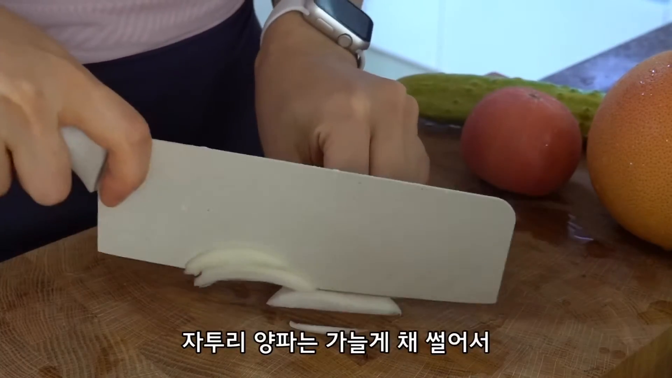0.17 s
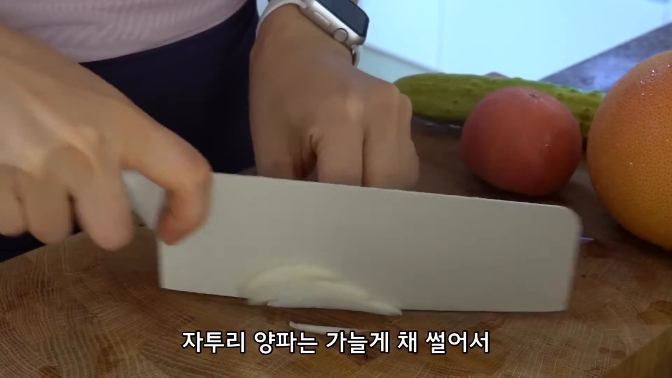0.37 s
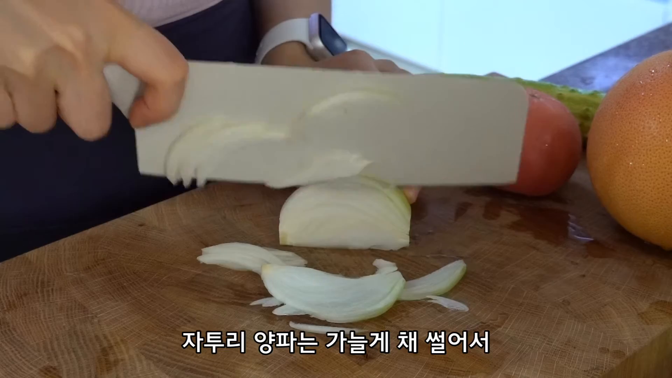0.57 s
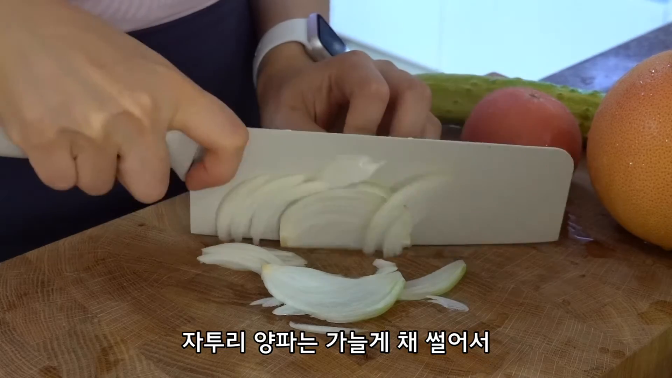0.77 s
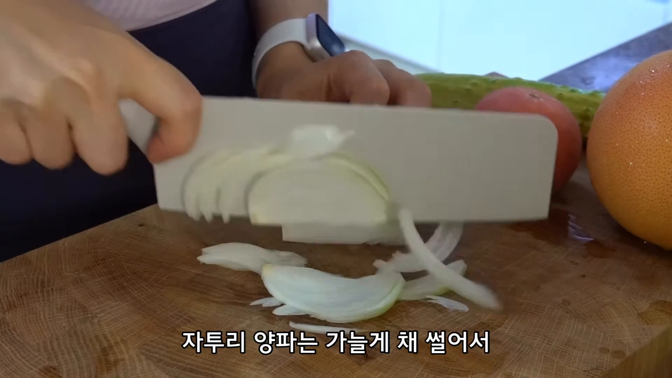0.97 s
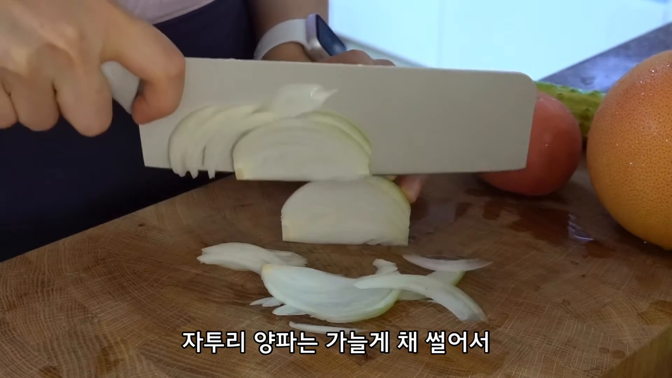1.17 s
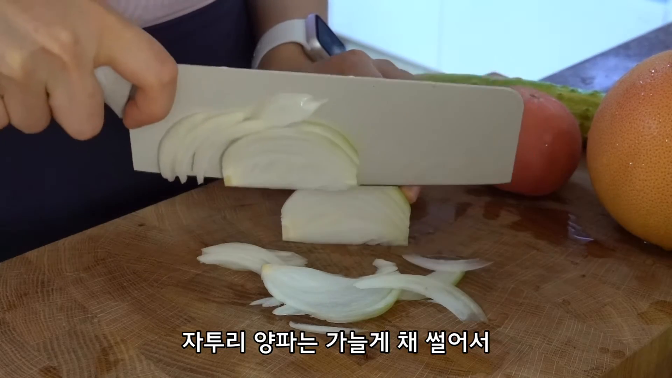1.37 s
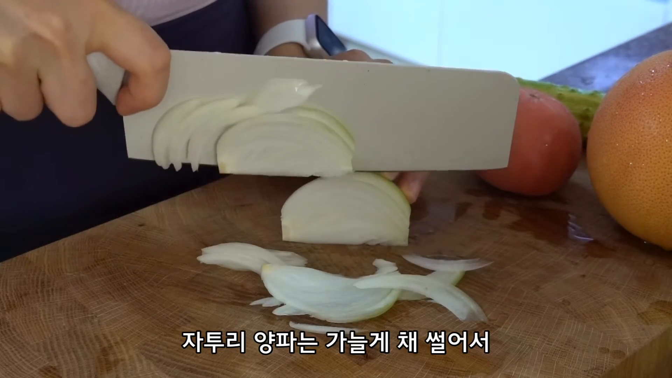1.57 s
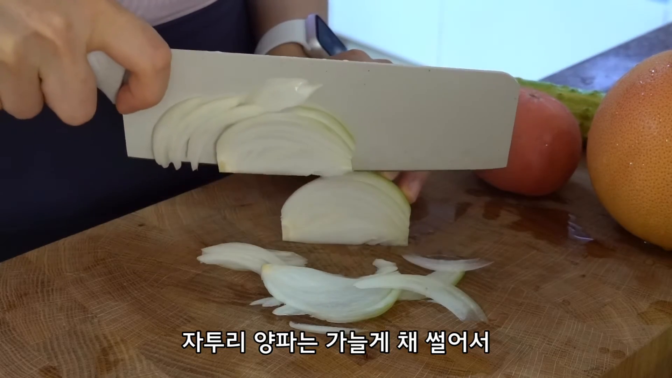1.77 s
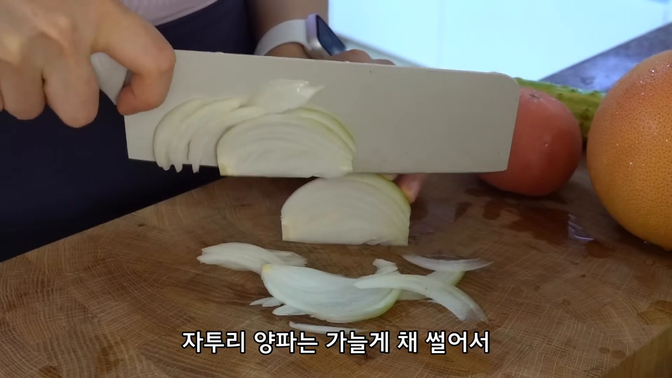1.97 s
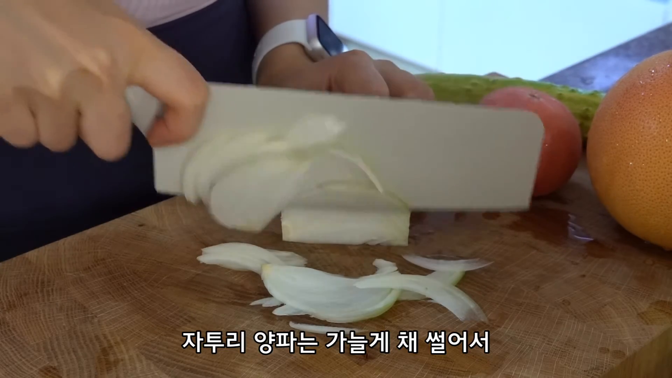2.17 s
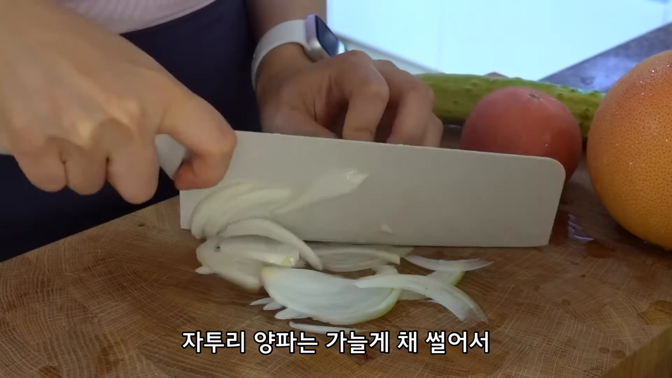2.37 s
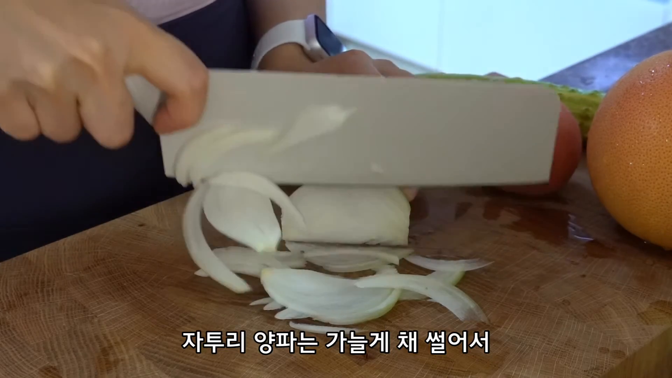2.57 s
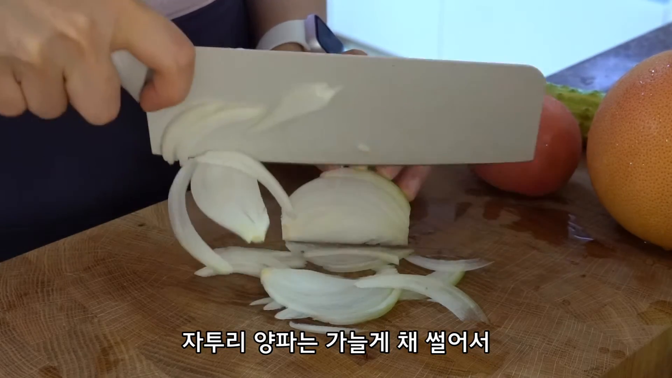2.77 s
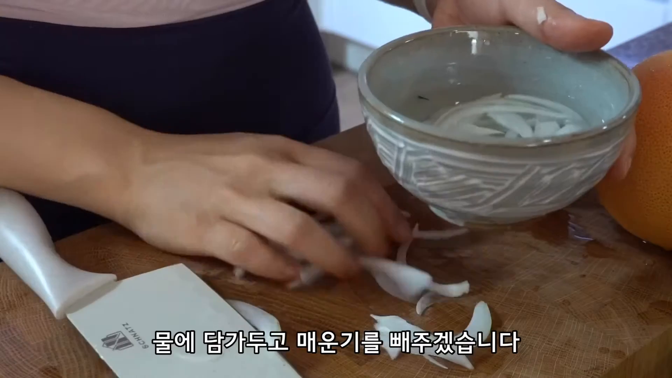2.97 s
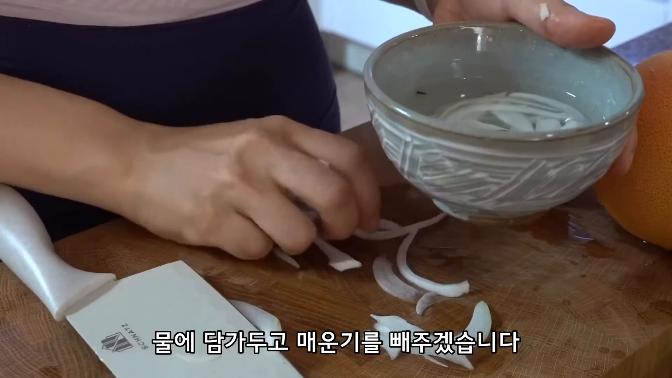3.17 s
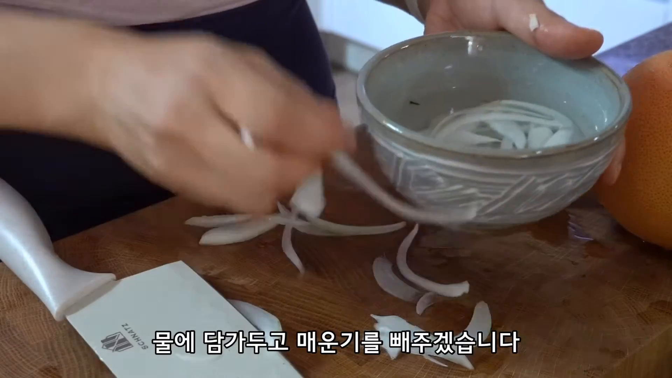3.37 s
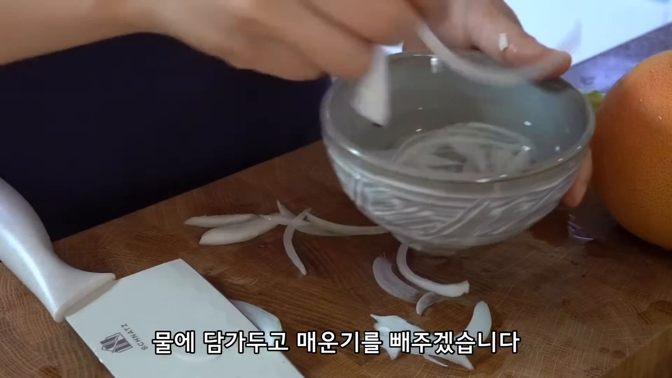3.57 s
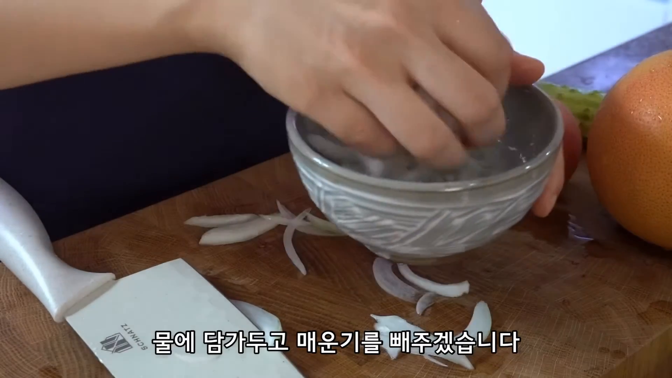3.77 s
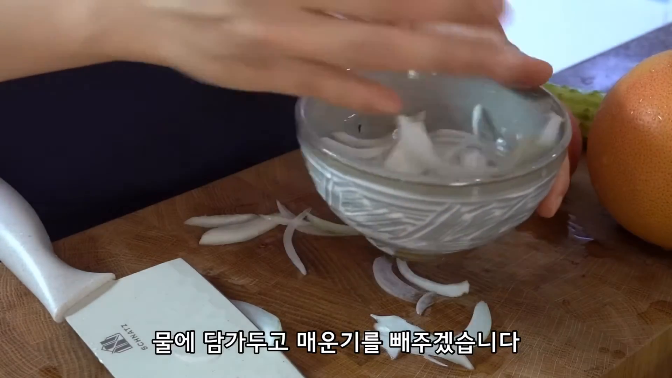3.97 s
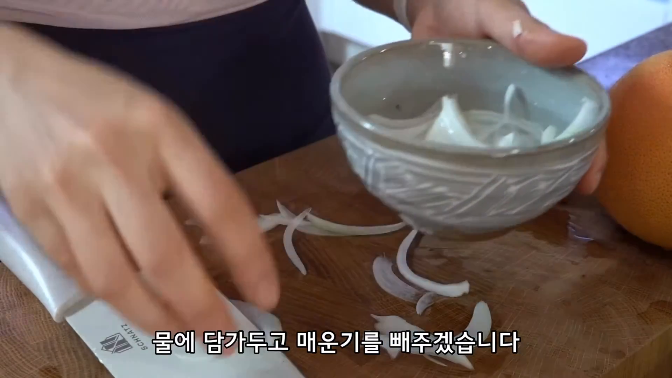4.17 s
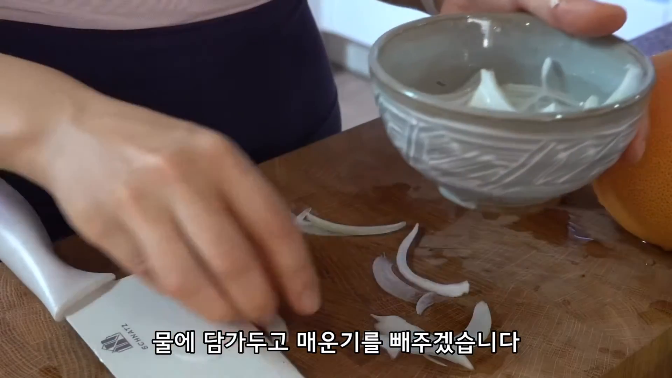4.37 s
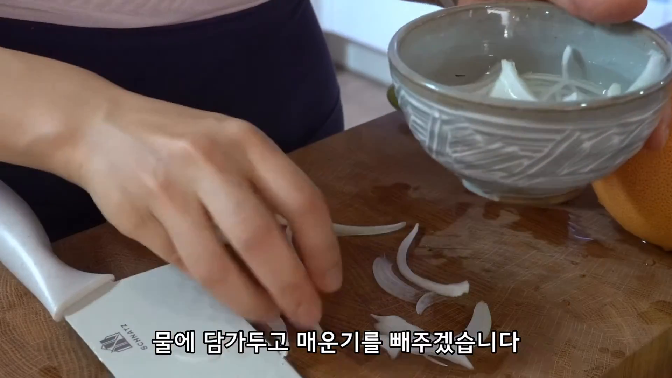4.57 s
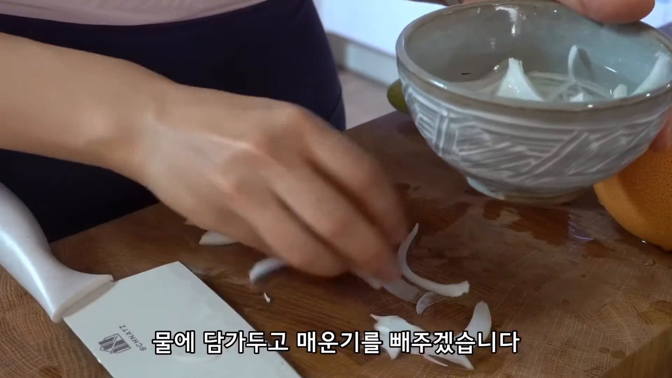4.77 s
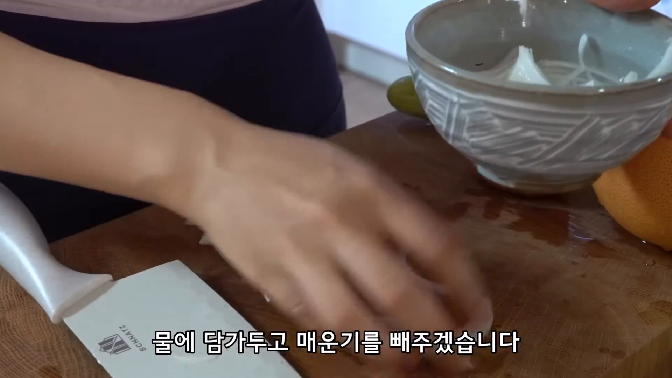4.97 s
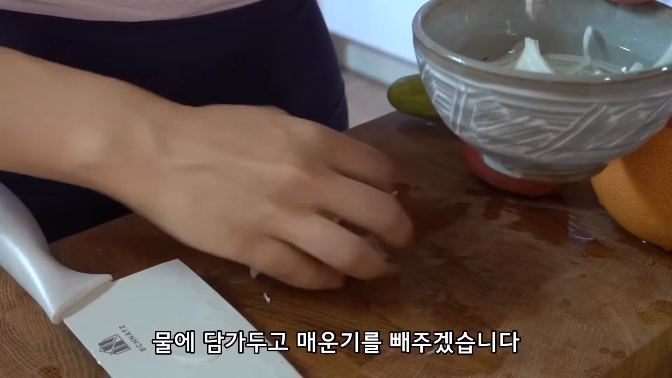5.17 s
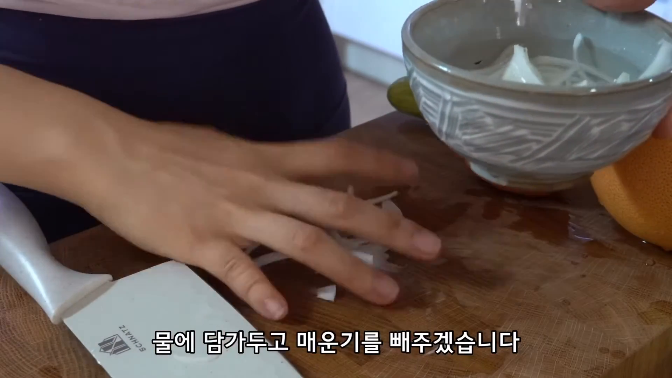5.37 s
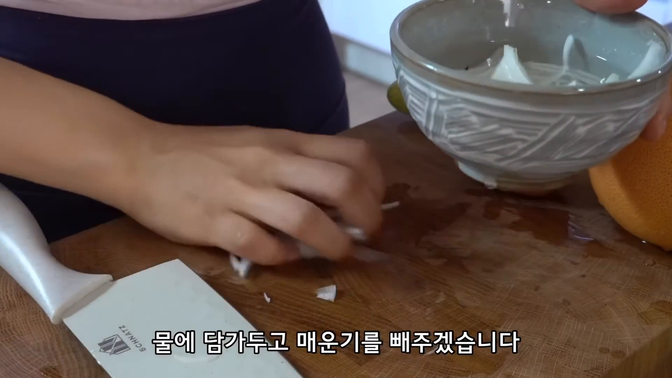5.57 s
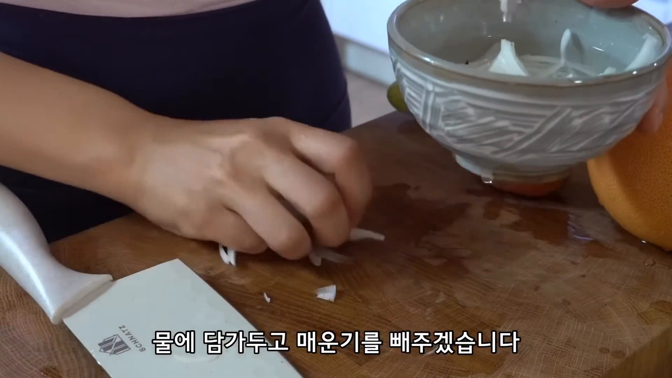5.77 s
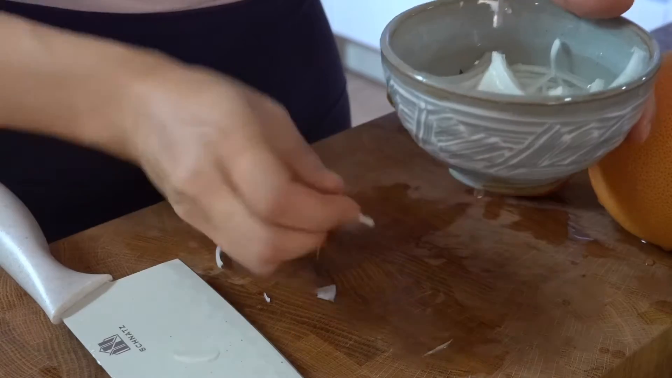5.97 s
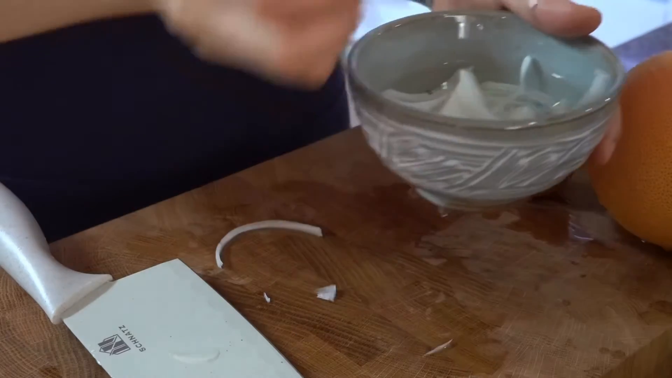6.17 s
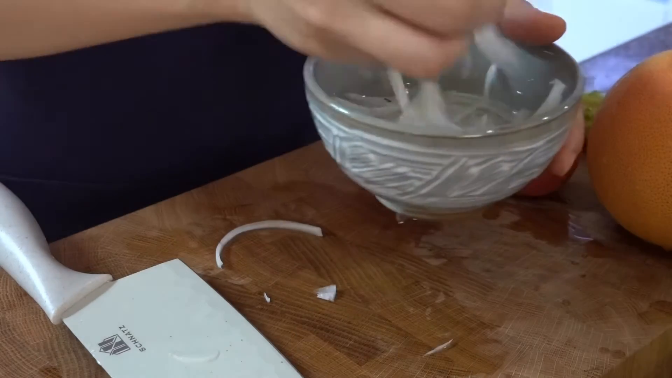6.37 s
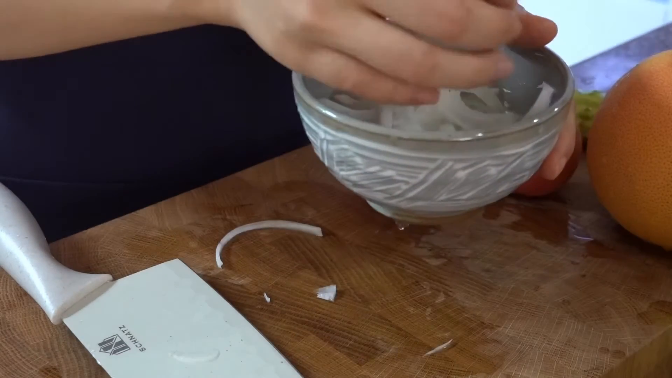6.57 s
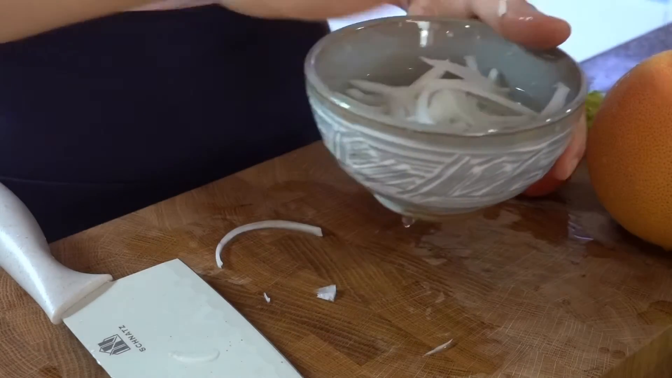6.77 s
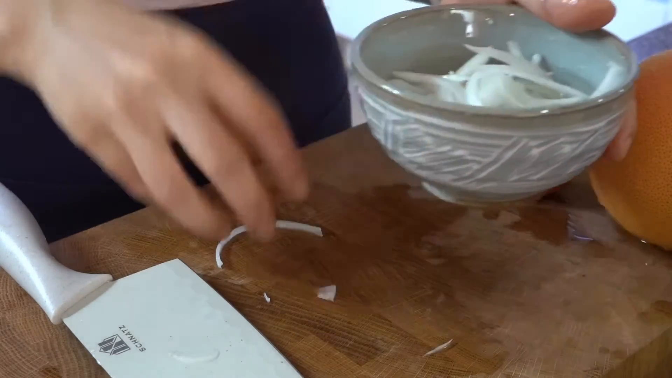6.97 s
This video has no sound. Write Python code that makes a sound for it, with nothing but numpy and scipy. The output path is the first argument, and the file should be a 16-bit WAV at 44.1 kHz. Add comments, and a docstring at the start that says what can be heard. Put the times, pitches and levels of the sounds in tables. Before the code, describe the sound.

A broad kitchen knife slices an onion three times, each crisp crunch ending in a ringing knock on a thick wooden board. Two cuts come close together, and the loudest follows a pause. A hand then softly sweeps up wet slices, nudges the resting knife into a short double rattle, and makes a few small wet smacks. Everything is close, in a hard-walled kitchen with a faint airy hum.

```python
"""Three crunching slices through an onion, each ending in a ringing knock, close up in a hard-walled kitchen.
Bursting cells spit and shake the broad knife until its edge lands and rings blade and thick wooden board.
A hand then sweeps up the wet slices, which stick and slip on the wood, nudges the resting knife into
a rattle, and drops the slices in a bowl with a few wet smacks. A faint airy hum lies underneath,
and a limiter holds the knocks down."""
import sys
import numpy as np
from scipy import signal
from scipy.fft import rfft, irfft, next_fast_len
from scipy.io import wavfile
from scipy.ndimage import uniform_filter1d, minimum_filter1d

SR = 44100
rng = np.random.default_rng(int(sys.argv[2]) if len(sys.argv) > 2 else 0)


def inscribe(sig):
    """Save sig as 16-bit PCM at rate SR to the path in sys.argv[1].

    A 1-D sig is mono; a 2-D sig holds one channel per row.
    Samples are clipped to [-1, 1] before scaling.
    """
    pcm = np.round(np.clip(np.atleast_2d(sig).T, -1, 1) * 32767)
    wavfile.write(sys.argv[1], SR, pcm.astype(np.int16))


N = 309141
TIME = np.arange(N) / SR

# The edge meets the board. Each row: time in seconds, blow in dB, highest pitch the contact drives in Hz,
# pitch favoured by that spot in Hz, its lift in dB, board thud in dB.
CHOPS = [(0.2690, -2, 2280, 1330, 6, -21), (0.6978, 0, 1940, 1840, 6.5, -20),
         (2.2131, 7.5, 3000, 1810, 11, -17.5)]
# The ring of the blade pressed on the board. Each row: pitch in Hz, level in dB, t60 in seconds.
BLADE = [(948.4, 1.5, 0.037), (1038, 1.5, 0.049), (1107, -1, 0.021), (1551, -2.5, 0.015),
         (1578, -7.5, 0.042), (1820, -11.5, 0.012), (1955, -2.5, 0.023), (2144, -7, 0.013),
         (2390, -11.5, 0.041), (2400, -6, 0.041), (2864, -0.5, 0.02), (3190, -7.5, 0.018),
         (4060, -5, 0.0041)]
# The dull body of the board. Each row: pitch in Hz, level in dB, t60 in seconds.
BOARD = [(147, -13, 0.065), (214, -10, 0.024), (308, -4, 0.044), (375.5, -0.5, 0.03), (420, -1, 0.029),
         (505, 3.5, 0.025), (565, 3.5, 0.0093), (818, 3.5, 0.013)]


def undb(db):
    """Decibels to gain."""
    return 10 ** (np.asarray(db) / 20)


def unit(x):
    """Scale to rms 1."""
    return x / np.sqrt(np.mean(x ** 2))


def decay(t, t60):
    """Envelope that falls by 60 dB in t60 seconds."""
    return np.exp(-np.log(1000) * t / t60)


def across(points, size):
    """A (Hz, value) table read at the bins of a spectrum of `size` samples."""
    hz, value = np.transpose(points)
    return np.interp(np.log(np.arange(size // 2 + 1) * SR / size + 1), np.log(hz), value)


def colour(x, points):
    """Filter by a (Hz, dB) table."""
    size = next_fast_len(len(x))
    return irfft(rfft(x, size) * undb(across(points, size)), size)[:len(x)]


def cut(x, hz, kind, order):
    """Causal low-pass or high-pass."""
    return signal.sosfilt(signal.butter(order, min(hz, SR / 2 - 100), kind, fs=SR, output="sos"), x)


def resonate(x, hz, q):
    """The band that one resonance picks out of a sound."""
    return signal.lfilter(*signal.iirpeak(hz, q, fs=SR), x)


def add(track, s, sound, db):
    """Mix a sound into a track at time s, with its peak at db."""
    start = int(s * SR)
    track[start:start + len(sound)] += (undb(db) * sound / np.abs(sound).max())[:len(track) - start]


def ring(modes, contact_s=.0001):
    """Struck modes, their dB setting energy; neighbours swing opposite ways, soft contact dulls the hit."""
    t = TIME[:int(max(row[2] for row in modes) * SR * 2)]
    tones = sum((-1) ** k * undb(db) / np.sqrt(t60) * np.sin(2 * np.pi * hz * t) * decay(t, t60)
                for k, (hz, db, t60) in enumerate(modes))
    return tones * (1 - np.exp(-t / contact_s))


def burst(t60, highpass_hz, lowpass_hz, orders=(2, 3)):
    """A short band of tearing noise that dies away."""
    t = TIME[:SR // 20]
    noise = rng.standard_normal(len(t)) * decay(t, t60)
    return cut(cut(noise, highpass_hz, "high", orders[0]), lowpass_hz, "low", orders[1])


def grains(per_s, spread_db):
    """Tiny clicks at random moments, a few much larger than the rest."""
    size = undb(spread_db * np.minimum(rng.exponential(size=N), 4))
    return (rng.random(N) < per_s / SR) * rng.choice([-1, 1], N) * size


def spurts(per_s, spread_db):
    """Gain of onion that yields unevenly, in small spurts."""
    return undb(spread_db * np.interp(TIME * per_s, np.arange(N), rng.standard_normal(N)))


def move(s, swell_s, hold_s, db, fade_db_per_s, swell_db=27):
    """Gain of one rubbing move: it swells up to time s, holds and fades."""
    before, after = np.maximum(s - TIME, 0), np.maximum(TIME - s - hold_s, 0)
    return undb(db - swell_db * before / swell_s - fade_db_per_s * after)


def diffuse(size):
    """Noise that arrives from all sides: alike left and right in the bass, unrelated in the treble."""
    # Stereo width. Each row: frequency in Hz, side minus mid in dB.
    width = [(40, -7.5), (140, -40), (350, -17.5), (700, -8), (1000, -8), (2200, -7.5), (3500, -1),
             (5500, 0.5), (8000, 2), (12000, -2.5)]
    side_gain = undb(across(width, size))
    mid, side = rfft(rng.standard_normal((2, size)))
    left_right = mid + np.array([[1], [-1]]) * side_gain * side
    return irfft(left_right / np.sqrt(1 + side_gain ** 2), size)


def background(level_db=-54, waver_db=1.26):
    """Steady airy hum of the kitchen with two faint resonances, wavering a little."""
    # The colour of the hum. Each row: frequency in Hz, relative level in dB.
    hum = [(25, -49), (60, -35), (110, -17), (180, -15.5), (330, -3.5), (550, -2), (830, -5), (1040, -3),
           (1400, -4.5), (2050, -1), (2900, -10), (4500, -13), (9000, -19), (16000, -20)]
    # Its narrow resonances. Each row: pitch in Hz, width in Hz, lift in dB.
    hum_peaks = [(1060, 55, 6.5), (1984, 90, 3.5)]
    waver = np.interp(TIME, np.linspace(0, TIME[-1], 40), rng.standard_normal(40))
    air = np.array([colour(channel, hum) for channel in diffuse(N)])
    for hz, width_hz, lift_db in hum_peaks:
        air = air + (undb(lift_db) - 1) * resonate(air, hz, q=hz / width_hz)
    return unit(air) * undb(level_db + waver_db * waver)


def kitchen(build_s=0.0049, smooth_bins=24):
    """Response of the hard-walled room: a few clear reflections and a dense, even tail."""
    # The reverberation. Each row: frequency in Hz, t60 in seconds.
    reverb_times = [(100, 0.51), (400, 0.46), (1000, 0.63), (2000, 0.58), (3000, 0.58), (5000, 0.65),
                    (10000, 0.63), (16000, 0.67)]
    # First reflections from counter, wall and ceiling. Each row: delay in seconds, level in dB.
    echoes = [(.0082, -10), (.0150, -23), (.0225, -11.5), (.0312, -30), (.0440, -9)]
    t = TIME[:SR]
    noise, tail = rfft(diffuse(SR)), 0
    for hz, t60 in reverb_times:
        share = across([(f, float(f == hz)) for f, _ in reverb_times], SR)
        tail = tail + irfft(noise * share, SR) * decay(t, t60)
    # even out the tail's peaks and dips, so the room rings smoothly with no stray pitches
    spectrum = rfft(tail)
    power = uniform_filter1d(np.mean(np.abs(spectrum) ** 2, axis=0), smooth_bins)
    tail = irfft(spectrum / np.sqrt(power), SR)
    build_up = 1 - np.exp(-(t / build_s) ** 2)
    fade_out = np.clip((.7 - t) * 10, 0, 1)
    tail = unit(tail * build_up * fade_out) / np.sqrt(SR)
    for delay_s, db in echoes:
        tail[:, int(delay_s * SR)] += undb(db)
    return tail


def nearby(x, scatter_db=-4, scatter_t60=0.028):
    """Board, hands and bowl scatter the treble within milliseconds, differently to left and right."""
    t = TIME[:SR // 20]
    response = unit(diffuse(len(t)) * decay(t, scatter_t60)) / np.sqrt(len(t))
    treble = cut(response, 4700, "high", order=3)
    return x + undb(scatter_db) * signal.fftconvolve(x[None], treble, axes=1)[:, :N]


def gathering(rub_db=-2, crackle_db=-3, push_db=-5):
    """Wet slices stick and slip on the wood while films of juice break."""
    # Fingers sweep, lift or drop slices. Each row: time of full contact, swell and hold in seconds,
    # then rubbing and wet crackle in relative dB.
    sweeps = [(0.01, .01, 0.091, -55.5, -69), (1.36, 0.45, 0.17, -59.5, -75),
              (2.848, 0.0075, .23, -48, -50), (3.15, 0.15, 0.14, -57.5, -64.5),
              (3.34, .07, .004, -51.5, -55.5), (3.775, 0.098, .02, -52, -61),
              (4.403, 0.083, .004, -44.5, -56), (5.004, 0.096, 0.067, -49.5, -53),
              (5.387, 0.11, 0.082, -56, -71), (5.54, 0.095, 0.064, -47, -53),
              (5.772, 0.065, 0.0049, -50, -48), (6.424, .12, .01, -62, -61)]
    # Hand and food press softly on the board. Each row: time of full contact, swell and hold in seconds,
    # relative level in dB.
    pushes = [(0, .01, .03, -51.5), (2.858, .02, 0.017, -48), (3.01, 0.086, 0.31, -58.5),
              (6.894, 0.27, .02, -53)]
    # The colours of the rubbing and of the juice. Each row: frequency in Hz, relative level in dB.
    rub_colour = [(100, -42), (600, -30), (1000, 0), (1350, -8.5), (2050, 0.5), (2800, -1), (3600, -12),
                  (5500, -25)]
    crackle_colour = [(200, -55), (2500, -38.5), (4000, -9.5), (6500, -3.5), (9000, 3.5), (11000, 3),
                      (13000, -10), (16000, -9.5)]
    rub = undb(rub_db) * unit(colour(grains(1500, 2.5), rub_colour))
    crackle = undb(crackle_db) * unit(colour(grains(4000, 4.5), crackle_colour))
    wood = signal.fftconvolve(grains(900, 1.8), ring(BOARD))[:N]
    push = undb(push_db) * unit(cut(wood, 210, "high", order=2))
    slices = np.zeros(N)
    for s, swell_s, hold_s, rubbing_db, wet_db in sweeps:
        texture = undb(rubbing_db) * rub + undb(wet_db) * crackle
        slices += texture * move(s, swell_s, hold_s, db=0, fade_db_per_s=180)
    pressure = sum(move(*row, fade_db_per_s=84) for row in pushes)
    return slices * spurts(per_s=45, spread_db=2.5) + push * pressure


def bounces(count=5, gap_s=.0125, shrink=.84, loss_db=1.14):
    """(delay s, dB) of a dropped handle's contacts, each sooner and weaker than the last."""
    k = np.arange(count)
    return list(zip(np.cumsum(gap_s * shrink ** k) - gap_s, -loss_db * k))


def rattles(grit_db=-6, tick_lift_db=-1, wood_db=-11.5, clack_db=-6):
    """The nudged knife slides, then bounces between blade and handle; each contact knocks the wood."""
    # The resting blade rocks against the board. Each row: time in seconds, ring in dB, relative tick in dB.
    rocks = [(4.333, -37.5, -58), (4.397, -25.5, -41), (4.4614, -27, -42), (4.48, -17, -32),
             (4.485, -14, -36), (4.4942, -6.5, -22.5), (4.504, -14, -26), (4.527, -13.5, -33),
             (4.662, -26, -32), (4.6775, -14, -28), (4.6833, -8, -14), (4.693, -3, -8.5),
             (4.710, -5.5, -20)]
    # The free blade's ring, its bright tick, and the handle with the board under it.
    # Each row: pitch in Hz, level in dB, t60 in seconds.
    blade_modes = [(2119, -6, .06), (2421, 0, .06), (2724, -2, .04), (2830, 1, .012), (3050, -7, .01),
                   (3380, -11, .01)]
    tick_modes = [(4260, -1, .03), (5600, -1, .006), (6830, 0, .008), (8000, -5, .004), (9640, -8, .016),
                  (11000, -7, .003)]
    handle_modes = [(215.7, -11, 0.032), (350, -8.5, 0.1), (552, 0.5, 0.07), (639, -11, 0.1),
                    (810, 5.5, 0.017), (966, 3, 0.06), (1076, 6, 0.069), (1470, 8, 0.0082),
                    (1850, 9.5, 0.011)]
    # The handle drops on the board. Each row: time in seconds, level in dB.
    handle_drops = [(4.496, -19), (4.696, -14)]
    # The blade slides a little. Each row: time of full contact, swell and hold in seconds, level in dB.
    slides = [(4.25, .03, .02, -58), (4.375, 0.11, .025, -49.5)]
    out = np.zeros(N)
    blade = cut(ring(blade_modes, contact_s=0.00064), 1100, "high", order=2)
    tick = ring(tick_modes, contact_s=0.00034)
    wood = cut(ring(handle_modes, contact_s=0.0016), 156, "high", order=3)
    for s, ring_db, tick_db in rocks:
        add(out, s, blade, ring_db)
        add(out, s, tick, tick_db + tick_lift_db)
        add(out, s, burst(0.037, 2800, 8100), tick_db + grit_db)
        add(out, s, wood, ring_db + wood_db)
    for s, db in handle_drops:
        for delay_s, bounce_db in bounces():
            clack = burst(0.11, 1300, 3700, orders=(2, 4))  # the hard handle
            add(out, s + delay_s, wood, db + bounce_db)
            add(out, s + delay_s, clack, db + bounce_db + clack_db)
    scrape = unit(resonate(grains(1500, 2.5), 2430, q=16))
    return out + scrape * sum(move(*row, fade_db_per_s=232) for row in slides)


def snaps(crack_span=1.32, tap_t60=0.027):
    """Single cracks and taps that stand out of the crunch and the rubbing."""
    # A whole onion layer snaps or a wet slice smacks. Each row: time in seconds, crack level in dB,
    # its pitch in Hz, its t60 in seconds, hollow body in dB.
    cracks = [(0.412, -24.5, 9600, 0.013, -30), (0.5576, -10.5, 8250, 0.011, -12.5),
              (0.825, -27.5, 8500, .02, -23), (0.8793, -31, 8900, 0.021, -28),
              (1.943, -31.5, 8000, .03, -40), (1.987, -24, 7900, .014, -30), (2.0288, -26, 8000, .014, -24),
              (2.0679, -19.5, 7500, .02, -20), (2.1196, -14, 7500, .014, -27),
              (2.178, -16.5, 8500, .012, -16), (2.85, -39, 10000, 0.022, -50),
              (3.3538, -35, 12500, .03, -41), (3.7524, -47, 12000, .03, -53),
              (5.598, -28, 10000, 0.054, -32), (5.6381, -27, 8800, .035, -31),
              (5.772, -25.5, 13000, 0.017, -35)]
    # Steel or a fingernail taps the wood. Each row: time in seconds, level in dB, pitch in Hz.
    taps = [(0.06, -42.5, 2800), (0.2164, -18.5, 1575), (0.224, -13.5, 2380), (0.2342, -6.5, 2266),
            (0.687, -11.5, 2980), (2.912, -38, 2400), (3.053, -31.5, 2690), (3.138, -43, 2460),
            (3.213, -35, 2800), (6.654, -46, 2400)]
    out = np.zeros(N)
    for s, crack_db, hz, t60, body_db in cracks:
        add(out, s, burst(t60, hz / crack_span, hz * crack_span, orders=(4, 2)), crack_db)
        add(out, s, burst(0.012, 2500, 2280), body_db)
    for s, db, hz in taps:
        # close modes beat, so the tap swells for a moment and is soon gone
        add(out, s, ring([(hz * 0.906, -3, tap_t60), (hz, 0, tap_t60), (hz * 1.2, -9, tap_t60)]), db)
    return out


def strokes(sink_db_per_s=65, give_db_per_s=68, chatter_offset_db=-11.5, chatter_slope=0.63):
    """Spray and chatter gains: they grow as the edge sinks, jump as the onion gives, stop as it lands."""
    # The way down through the onion. Each row: when the edge enters and when the last layers give way
    # in seconds, then in relative dB the crunch just before that, and the spray and chatter just after.
    descents = [(0.122, 0.219, -47.5, -32, -23), (0.481, 0.662, -27, -27.5, -23.5),
                (1.939, 2.178, -31, -30.5, -30)]
    spray, chatter = np.zeros((2, N))
    for (enters_s, gives_s, crunch_db, spray_db, chatter_db), (lands_s, *_) in zip(descents, CHOPS):
        sinking = (TIME >= enters_s) & (TIME < gives_s)
        # more and more of the edge is in the onion
        rising_db = crunch_db - sink_db_per_s * np.maximum(gives_s - TIME, 0)
        # the freed blade speeds up
        speed_up = undb(give_db_per_s * (np.minimum(TIME, lands_s) - gives_s))
        giving = ((TIME >= gives_s) & (TIME < lands_s)) * speed_up
        spray += sinking * undb(rising_db) + giving * undb(spray_db)
        chatter += sinking * undb(chatter_offset_db + chatter_slope * rising_db) + giving * undb(chatter_db)
    layers = spurts(per_s=90, spread_db=1.7)
    return uniform_filter1d(spray, size=90) * layers, uniform_filter1d(chatter, size=90) * layers


def slicing(chatter_db=-4.0, spray_db=-2, sing_db=-8, body_db=-16):
    """Onion cells burst under the edge: each spits in the treble, shakes the blade and presses the board."""
    # The colours of blade chatter and of the spitting cells. Each row: frequency in Hz, relative level in dB.
    chatter_colour = [(100, -36), (500, -51), (820, -29), (980, -23), (1250, -7), (1700, -1), (2200, 3.5),
                      (2600, 1.5), (2900, 2), (3600, -1.5), (4300, -7.5), (5500, -35)]
    spray_colour = [(200, -58), (2500, -42), (4000, -43), (5000, -5.5), (6200, 2.5), (8500, 1.5),
                    (11000, 2.5), (13500, -3), (16000, -10)]
    cells = grains(per_s=3500, spread_db=3.46)
    spray_gain, chatter_gain = strokes()
    chatter = undb(chatter_db) * unit(colour(cells, chatter_colour))
    spray = undb(spray_db) * unit(colour(cells, spray_colour))
    sing = undb(sing_db) * unit(signal.fftconvolve(cells, ring(BLADE[:2]))[:N])  # the two lowest modes
    wood = signal.fftconvolve(cells, ring(BOARD))[:N]
    body = undb(body_db) * unit(cut(wood, 170, "high", order=2))
    return chatter * chatter_gain + (spray + sing + body) * spray_gain


def chop(room, blow_db, contact_hz, spot_hz, lift_db, thud_db, linger_db=-11, crack_db=-22, room_db=4):
    """The edge lands: the blade rings up to the pitch that the contact allows, and the board thuds."""
    # Lingering tones of counter and kitchen. Each row: pitch in Hz, level in dB, t60 in seconds.
    linger_modes = [(152, -24, .5), (921, 2, .55), (940, -5, .45), (965, -7, .45), (1016, 4, .6),
                    (1075, -9, .5), (1092, -10, .5), (1168, -6, .55), (1232, -10, .5), (1408, -10, .5),
                    (1491, -8, .5), (1725, -12, .5), (1777, -9, .5), (1920, 0, .55), (2018, 3, .6),
                    (2422, -10, .45), (2829, -7, .45)]
    knock, linger = np.zeros((2, SR))
    blade = cut(ring(BLADE), 850, "high", order=6)  # air slips round the blade at low pitch
    blade = blade + (undb(lift_db) - 1) * resonate(blade, spot_hz, q=3)
    add(knock, 0, cut(blade, contact_hz, "low", order=5), blow_db)
    add(knock, 0, cut(ring(BOARD), 144, "high", order=4), thud_db)
    add(knock, 0, burst(0.039, 4200, 4400), blow_db + crack_db)  # the last skin of the onion tears
    add(linger, .008, cut(ring(linger_modes), contact_hz, "low", order=3), blow_db + linger_db)
    # the broad blade throws most of its knock sideways into the room
    return knock + linger + undb(room_db) * signal.fftconvolve(knock[None], room, axes=1)[:, :SR]


def chops(room, first_ends_s=.48, fade_s=0.0028):
    """The three knocks, each with its reverberation; the ring of the first breaks off abruptly at 0.48 s."""
    out = np.zeros((2, N))
    for s, *blow in CHOPS:
        start = int(s * SR)
        gate = np.clip((first_ends_s - s - TIME[:SR]) / fade_s, 0, 1) if s < first_ends_s else 1
        out[:, start:start + SR] += chop(room, *blow) * gate
    return out


def scene(rattle_room_db=-7.0, food_room_db=-6):
    """Knife and onion sound close up on the board, with the kitchen ringing and humming behind them."""
    room, rattle = kitchen(), rattles()
    food = slicing() + gathering() + snaps()
    send = undb(rattle_room_db) * rattle + undb(food_room_db) * food
    reverb = signal.fftconvolve(send[None], room, axes=1)[:, :N]
    return chops(room) + nearby(rattle + food) + reverb + background()


def record(dry, limit_db=-2, hold_s=0.0072, top_hz=16100):
    """A fast limiter rides the knocks, and a steep low-pass cuts the very top."""
    size = int(hold_s * SR)
    gain = np.minimum(1, undb(limit_db) / (np.abs(dry).max(axis=0) + 1e-9))
    limited = dry * uniform_filter1d(minimum_filter1d(gain, size), size)
    return signal.sosfilt(signal.ellip(10, .1, 80, top_hz, fs=SR, output="sos"), limited)


dry = scene()
out = record(dry)
inscribe(out)
```